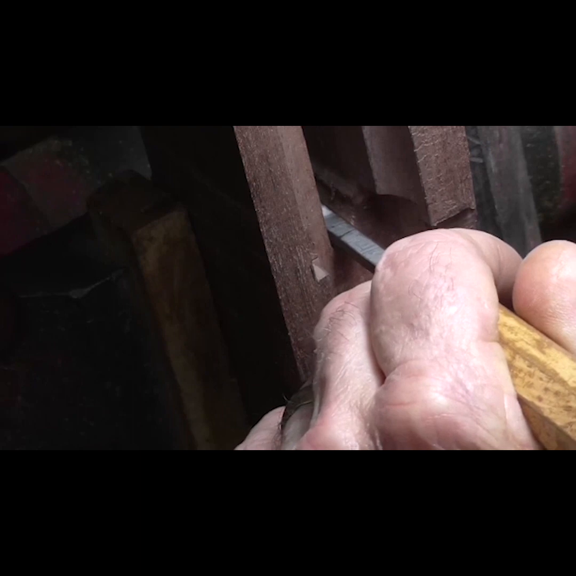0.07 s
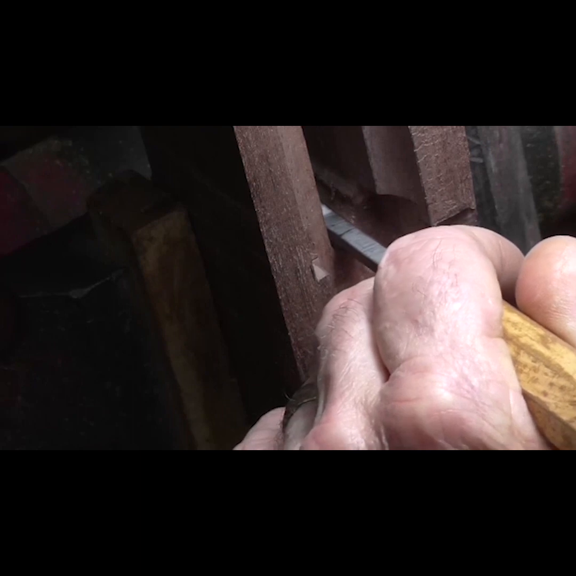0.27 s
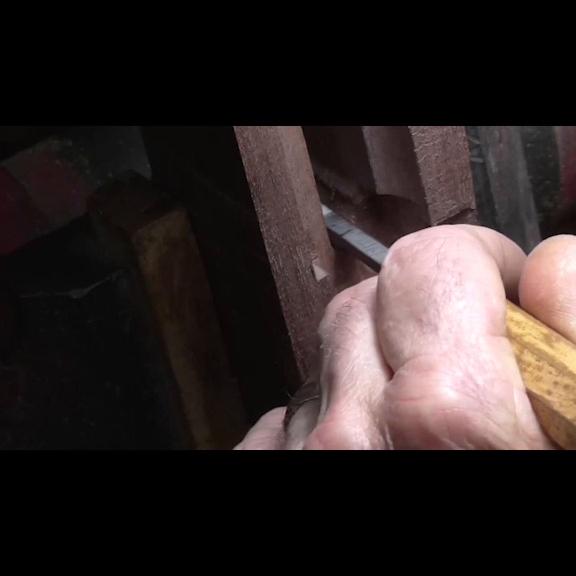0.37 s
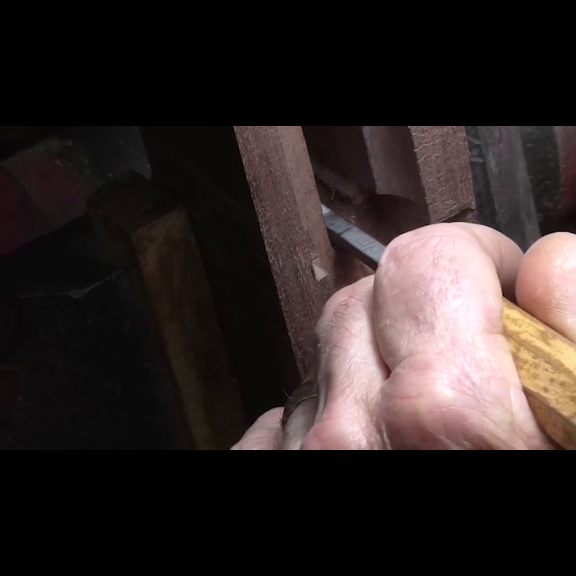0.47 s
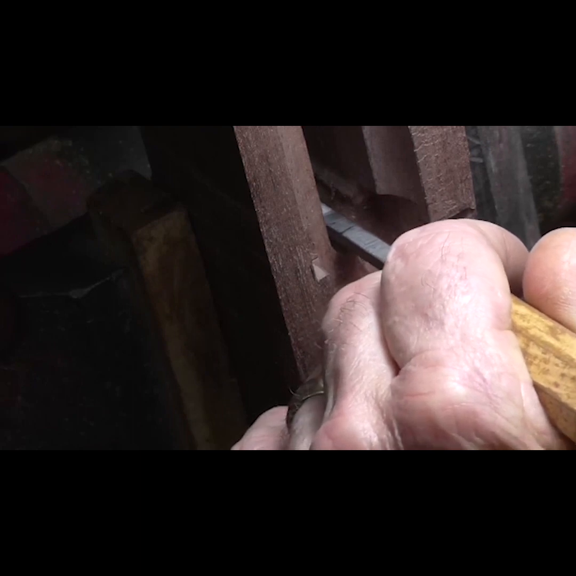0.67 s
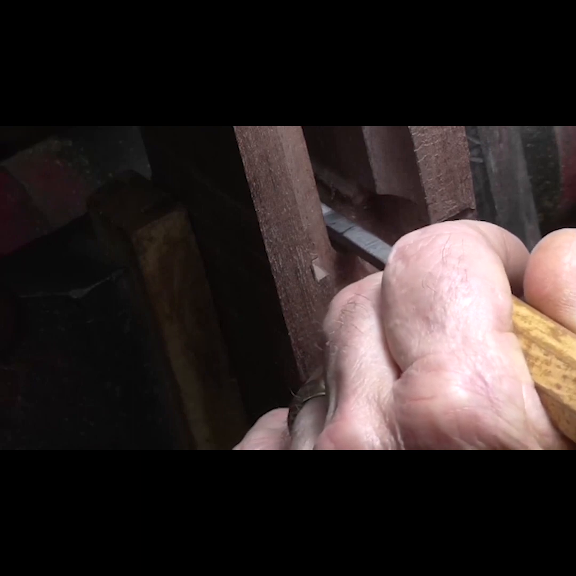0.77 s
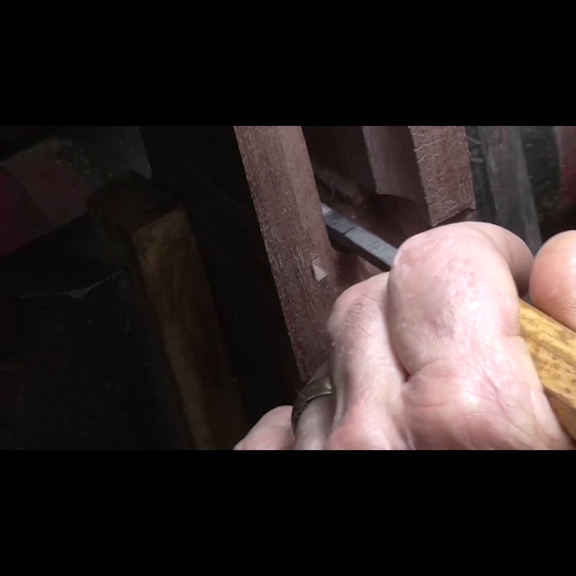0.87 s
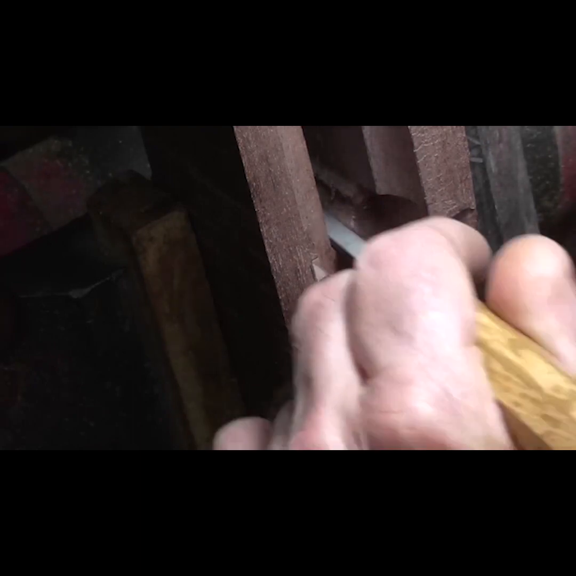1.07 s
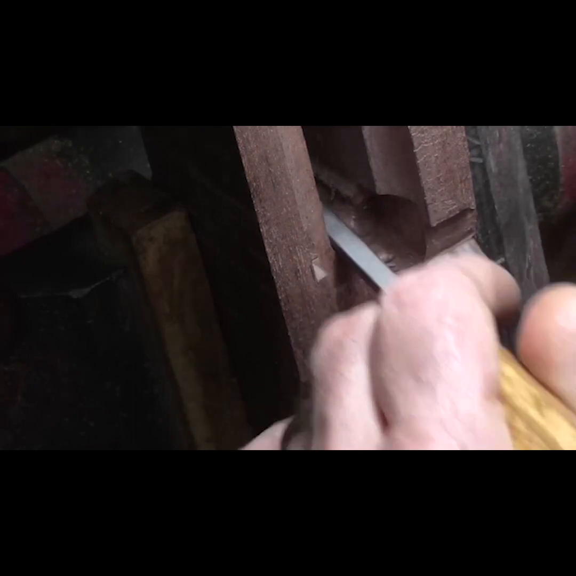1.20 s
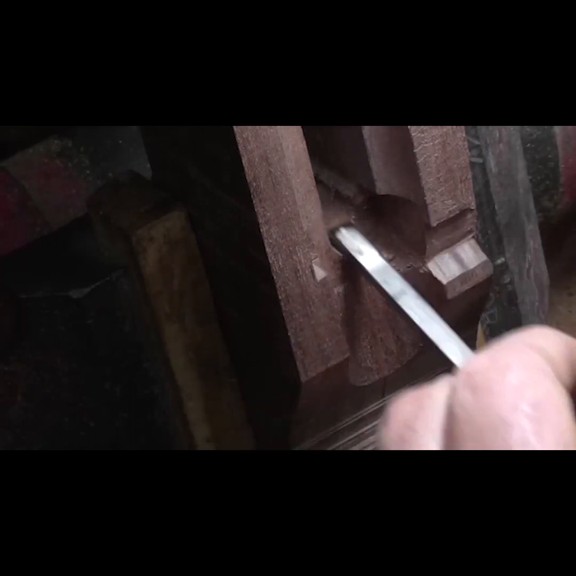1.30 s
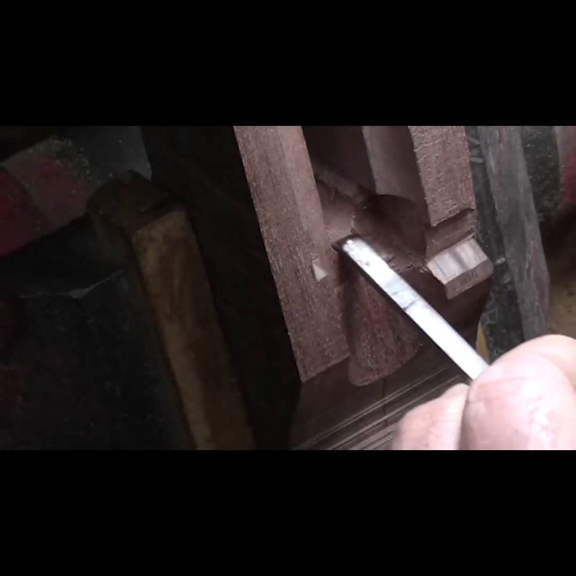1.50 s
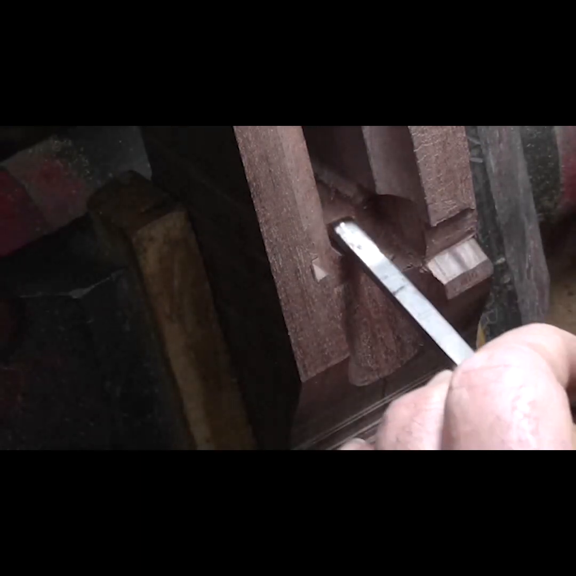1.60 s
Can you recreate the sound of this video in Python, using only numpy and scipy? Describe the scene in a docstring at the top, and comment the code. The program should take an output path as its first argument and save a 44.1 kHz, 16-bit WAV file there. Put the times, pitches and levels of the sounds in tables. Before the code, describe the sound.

A mallet knocks a chisel into wood four times, then the blade eases out, ticking lightly.

```python
"""A mallet drives a chisel into a wooden stock, four blows a second, close by in a small workshop.
Each blow rings the wood with a hollow knock; one splits off a chip with a bright crack of fibres.
The blade is then eased out with light ticks and a squeaky scrape, over faint hum and hiss."""
import sys
import numpy as np
from scipy import signal
from scipy.fft import rfft, irfft
from scipy.io import wavfile

SR = 44100
rng = np.random.default_rng(int(sys.argv[2]) if len(sys.argv) > 2 else 0)


def master_out(mix):
    """Clip the mix to full scale and print it as 16-bit PCM to the path in sys.argv[1]."""
    frames = np.transpose(np.atleast_2d(mix))
    ceiling = np.clip(frames, -1, 1)
    pcm = np.round(ceiling * 32767).astype(np.int16)
    wavfile.write(sys.argv[1], SR, pcm)


N = 72765
T = np.arange(int(.6 * SR)) / SR  # time within one event, s

# Steel rubbing on wood. Each row: frequency in Hz, relative density in dB.
RUB_SPECTRUM = [(30, -43), (200, 6), (700, 12), (1800, 0.5), (3200, -3.5), (5100, 1.5), (7000, -7),
                (11000, -11.5), (16000, -19)]


def blow(level_db, tilt_db_per_oct, note_db, click_db):
    """One mallet blow: contact pulse, ringing wood, edge click and room response."""
    pan_db = -1.3  # left relative to right
    direct = mallet_thud() + wood_ring(tilt_db_per_oct, note_db) + edge_click(click_db) + room_boom()
    panned = direct * amp([[pan_db / 2], [-pan_db / 2]])
    return amp(level_db) * (panned + early_echoes() + shop_tail())


def mallet_thud():
    """Hard mallet contact: one short minimum-phase pulse."""
    # Each row: frequency in Hz, relative density in dB.
    spectrum = [(25, -34), (70, -7), (150, -15.5), (260, 0.5), (450, -7.5), (700, -3), (1100, 16),
                (1500, -5.5), (2000, 5), (2600, -44.5), (8000, -44)]
    size = 4096
    log_gain = np.log(amp(read(spectrum, abs(np.fft.fftfreq(size, 1 / SR)))))
    pulse = np.fft.ifft(np.exp(np.conj(signal.hilbert(log_gain)))).real
    return -amp(17.5) * np.pad(pulse, (0, len(T) - size))


def wood_ring(tilt_db_per_oct, note_db):
    """Struck modes of stock and chisel; higher modes start later."""
    # Main note first. Each row: frequency in Hz, relative level in dB, T60 in seconds.
    modes = [(521.9, -12.5, 0.27), (247.4, -14.5, 0.13), (360, -21.5, 0.16), (442, -13, 0.046),
             (486.5, -19, 0.023), (612, -53.5, 0.24), (712, -13, 0.017), (944, -33.5, 0.075),
             (1119.3, -3.5, 0.043), (1196, -40.5, .14), (1420, 0.5, 0.013), (1536, -25.5, 0.11),
             (1833, -15.5, 0.051), (1844, -7.5, 0.012), (2311, -28, 0.088)]
    trim_db, lag_s_per_khz = -0.5, 0.000535
    wood = 0
    for k, (hz, db, t60_s) in enumerate(modes):
        level_db = trim_db + db + tilt_db_per_oct * np.log2(hz / 1e3) + note_db * (k == 0)
        wood += amp(level_db) * ring(hz, t60_s, lag_s_per_khz * hz / 1e3)
    return wood


def edge_click(level_db):
    """The edge bites: a brief, bright noise burst."""
    # Each row: frequency in Hz, relative density in dB.
    spectrum = [(500, -26), (2000, 6.5), (3200, 0), (4800, 7), (6500, -0.5), (9000, -3), (12500, -7.5),
                (16000, -16)]
    return amp(level_db - 18.5) * fade(t60_s=0.019) * noise(lambda hz: read(spectrum, hz), width=0.11)


def fibre_split(level_db, centre_hz, width_oct, t60_s):
    """A dying burst of tiny fibre snaps that sets the steel ringing faintly."""
    # High steel modes. Each row: frequency in Hz, relative level in dB, T60 in seconds.
    steel_modes = [(4705, -19, .25), (5642, -17, .25), (5997, -13, .24), (8398, -9, .13), (9523, -9, .16),
                   (11320, -9, .16), (11880, -5, .1)]
    cutoff_hz = 13800
    colour = lambda hz: hump(centre_hz, width_oct)(hz) - 20 * np.log10(1 + (hz / cutoff_hz) ** 10)
    steel = sum(amp(db + colour(hz) - 60 * T / mode_t60_s) * np.sin(2 * np.pi * hz * T)
                for hz, db, mode_t60_s in steel_modes)
    snaps = fade(t60_s) * noise(colour, width=.55, grain_db=2.5)
    return amp(level_db) * (steel + snaps)


def blade_tick(ring_db, touch_db, centre_hz, ping_db):
    """The loose blade touches the wall of the cut, pings and rings faintly."""
    # Blade resting on wood. Each row: frequency in Hz, relative level in dB, T60 in seconds.
    modes = [(534, 5, 0.29), (1171, -1, 0.17), (1372, -6, 0.15), (1650, -8, 0.06), (2027, -9.5, .06),
             (2276, -8.5, 0.089)]
    emphasis = hump(centre_hz, width_oct=0.46)
    ringing = sum(amp(db + emphasis(hz)) * ring(hz, t60_s) for hz, db, t60_s in modes)
    envelope = fade(t60_s=.035) + amp(-6.5) * fade(t60_s=0.27)
    touch = envelope * noise(lambda hz: read(RUB_SPECTRUM, hz), width=.45)
    ping = fade(t60_s=0.018) * noise(hump(centre_hz=5260, width_oct=0.15), width=.45)
    return amp(ring_db) * ringing + amp(ping_db) * ping + amp(touch_db) * touch


def blade_slide():
    """Grainy friction and a thin rising squeak as the blade is drawn out."""
    # Each row: time in seconds, level in dB, squeak pitch in Hz.
    stroke = [(1.23, -80, 4920), (1.285, -54.5, 4860), (1.318, -57.5, 4860), (1.327, -58.5, 5670),
              (1.355, -61.5, 6000), (1.385, -62, 5730), (1.431, -84, 5730)]
    times_s, levels_db, pitches_hz = np.transpose(stroke)
    bandwidth_hz = 490
    t = np.arange(N) / SR
    waver = noise(lambda hz: -20 * np.log10(1 + (2 * hz / bandwidth_hz) ** 2), width=0.25, size=N)
    phase = 2 * np.pi * np.cumsum(np.interp(t, times_s, pitches_hz)) / SR
    squeak = np.sqrt(2) * waver * np.sin(phase)
    rub = amp(1.5) * noise(lambda hz: read(RUB_SPECTRUM, hz), width=.45, size=N, grain_db=5)
    envelope = amp(np.interp(t, times_s, levels_db)) * (t > times_s[0]) * (t < times_s[-1])
    return envelope * (squeak + rub)


def early_echoes():
    """Dense, quickly fading reflections from stock, hand and bench."""
    # Each row: frequency in Hz, relative density in dB.
    spectrum = [(30, -26), (120, -45), (200, -2), (330, 8.5), (550, 11.5), (800, -4.5), (1300, 1.5),
                (1900, 6), (2600, -34), (8000, -45)]
    envelope = amp(-9.5) * fade(t60_s=0.063, build_s=0.00033)
    return envelope * noise(lambda hz: read(spectrum, hz), width=0.47)


def room_boom():
    """A low room resonance that swells just after a blow."""
    pitch_hz, delay_s, build_s, t60_s = 252.7, 0.028, 0.028, .11
    t = np.maximum(T - delay_s, 0)
    envelope = amp(-16.5 - 60 * t / t60_s) * (1 - np.exp(-t / build_s))
    return envelope * np.sin(2 * np.pi * pitch_hz * t)


def shop_tail():
    """Diffuse reverberation, each band dying at its own rate."""
    # Each row: frequency in Hz, relative density in dB, T60 in seconds.
    bands = [(60, -21, .3), (170, -8, 0.67), (340, 2.5, 0.39), (526, -1.5, 0.56), (680, -6, 0.35),
             (884, -8, 0.44), (1130, 3, 0.39), (1505, 2.5, 0.39), (1795, 2.5, .32), (2070, -16.5, 0.54),
             (2593, -20, 0.33), (5020, -12.5, 0.17), (8000, -35, 0.33), (14760, -41.5, .15)]
    build_s = 0.0056
    wash = noise(lambda hz: read(bands, hz), width=.4)
    band_hz, t, frames = signal.stft(wash, SR, nperseg=256)
    decay = amp(-60 * t / read(bands, band_hz, column=2)[:, None])
    tail = signal.istft(frames * decay, SR, nperseg=256)[1]
    return amp(-27.5) * tail[:, :len(T)] * (1 - np.exp(-T / build_s))


def shop_air():
    """Faint machine hum and a hiss that drifts slightly in level."""
    # Each row: frequency in Hz, RMS level in dB.
    hum_tones = [(120, -65.5), (172, -68), (360, -61), (480, -64)]
    # Each row: frequency in Hz, relative density in dB.
    hiss_spectrum = [(15, -47), (30, -24), (60, -15.5), (140, -2.5), (260, -0.5), (450, -11.5), (800, -11),
                     (1500, -15.5), (3200, -28), (5500, -20), (7500, -24.5), (9500, -20), (12000, -31),
                     (15000, -25), (16500, -49.5)]
    # Each row: time in seconds, RMS level in dB.
    hiss_levels = [(0, -50.5), (.4, -51), (.65, -52.5), (.95, -53), (1.25, -50.5), (1.65, -51.5)]
    t = np.arange(N) / SR
    hum = sum(amp(db) * np.sqrt(2) * np.sin(2 * np.pi * (hz * t + rng.random())) for hz, db in hum_tones)
    hiss = noise(lambda hz: read(hiss_spectrum, hz), width=0.66, size=N)
    return hum + amp(np.interp(t, *np.transpose(hiss_levels))) * hiss


def amp(db):
    """Decibels to gain."""
    return 10 ** (np.asarray(db) / 20)


def read(spectrum, hz, column=1):
    """One table column, interpolated over log frequency."""
    columns = np.transpose(spectrum)
    return np.interp(np.log(hz + 1), np.log(columns[0]), columns[column])


def add(mix, start_s, sound):
    """Mixes a sound in; the start may be negative."""
    at = round(start_s * SR)
    sound = sound[..., max(-at, 0):]
    part = mix[:, max(at, 0):][:, :sound.shape[-1]]
    part += sound[..., :part.shape[1]]


def noise(colour, width, size=len(T), grain_db=0):
    """Unit-RMS stereo noise. Colour maps Hz to dB, width is the side gain, grain adds crackle."""
    white = rng.standard_normal((2, size))
    mid, side = white * amp(grain_db * np.minimum(rng.exponential(1, size), 5))
    gain = amp(colour(np.fft.rfftfreq(size, 1 / SR)))
    stereo = irfft(rfft([mid + width * side, mid - width * side]) * gain, size)
    return stereo / np.sqrt(np.mean(stereo ** 2))


def hump(centre_hz, width_oct):
    """A resonance with gentle skirts, as a map from Hz to dB."""
    return lambda hz: -20 * np.log10(1 + (np.log2((hz + 1) / centre_hz) / width_oct) ** 2)


def fade(t60_s, build_s=0.00052):
    """Quick rise, exponential decay."""
    return (1 - np.exp(-T / build_s)) * amp(-60 * T / t60_s)


def ring(hz, t60_s, lag_s=0, build_s=0.0015):
    """One damped mode, building up after a lag."""
    t = np.maximum(T - lag_s, 0)
    return -np.sin(2 * np.pi * hz * t) * (1 - np.exp(-t / build_s)) * amp(-60 * t / t60_s)


def scene():
    """Blows, splitting fibres and the withdrawn blade over the workshop air."""
    # Each row: start in seconds, gain in dB, mode tilt in dB/octave, main note and click gains in dB.
    blows = [(-.04, 1, 3, -9, 3), (0.2229, 1, 1, 1, 4), (.4718, 0.5, 4.3, 0, 11), (0.7245, 0.5, 1.7, 3, 4)]
    # Each row: start in seconds, level in dB, centre in Hz, width in octaves, T60 in seconds.
    splits = [(.473, -30.5, 4600, .7, 0.27), (0.497, -31.5, 11200, 0.75, .15),
              (.526, -41.5, 6100, 0.16, 0.2), (0.6363, -46, 5750, 0.17, 0.073)]
    # Each row: start in seconds, ring and touch gains in dB, ring centre in Hz, ping gain in dB.
    ticks = [(1.0377, -33.5, -40.5, 1710, -33.5), (1.045, -42, -45.5, 670, -38),
             (1.0642, -36.5, -40.5, 1047, -42), (1.128, -48, -55, 690, -64),
             (1.1415, -42, -46.5, 1420, -42), (1.2168, -64, -51.5, 1200, -48),
             (1.305, -45, -51.5, 1220, -56), (1.376, -35, -48.5, 2050, -55)]
    mix = shop_air() + blade_slide()
    for source, events in ((blow, blows), (fibre_split, splits), (blade_tick, ticks)):
        for start_s, *settings in events:
            add(mix, start_s, source(*settings))
    return mix


def record(dry):
    """The microphone rounds off the loudest peaks; a low-pass limits the band."""
    ceiling, knee, cutoff_hz = .85, 3.5, 16500
    rounded = dry / (1 + abs(dry / ceiling) ** knee) ** (1 / knee)
    lowpass = signal.firwin(255, cutoff_hz, window=("kaiser", 9), fs=SR)
    return signal.oaconvolve(rounded, lowpass[None], "same")


dry = scene()
out = record(dry)
master_out(out)
```